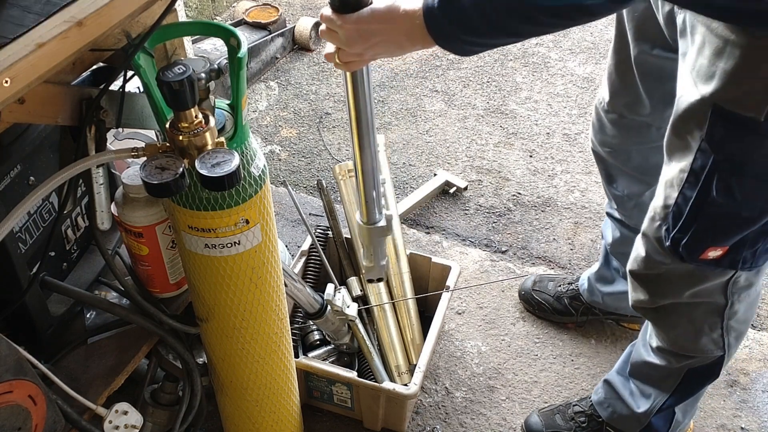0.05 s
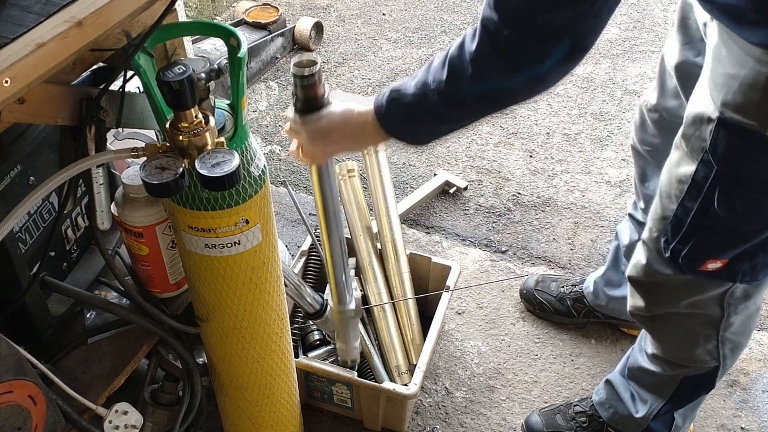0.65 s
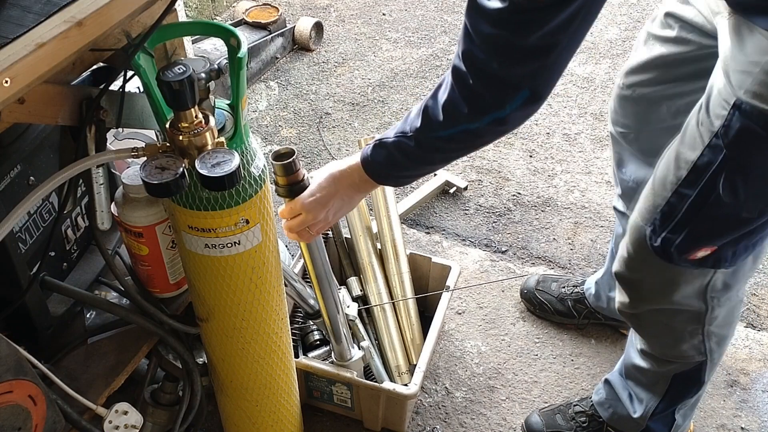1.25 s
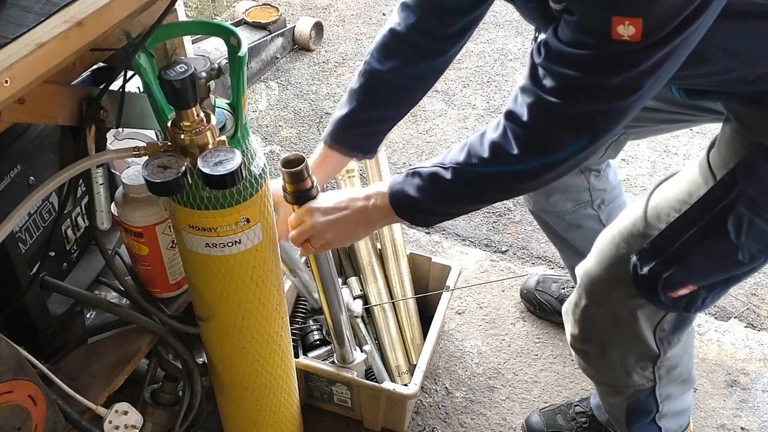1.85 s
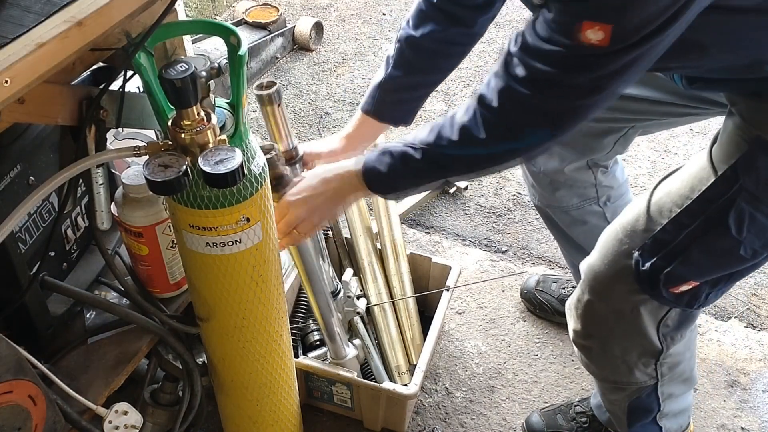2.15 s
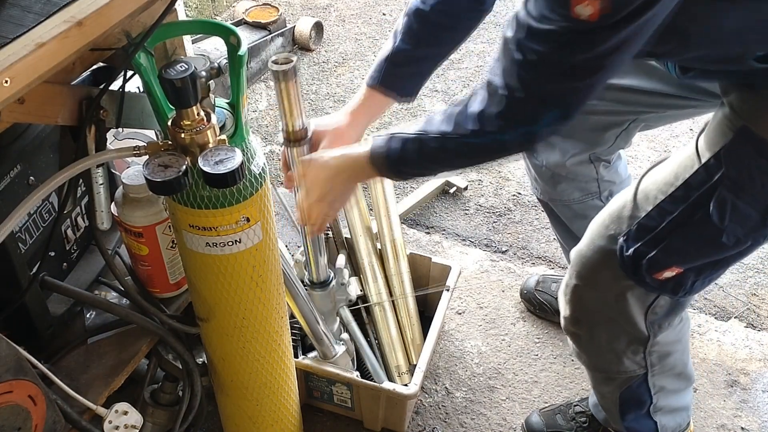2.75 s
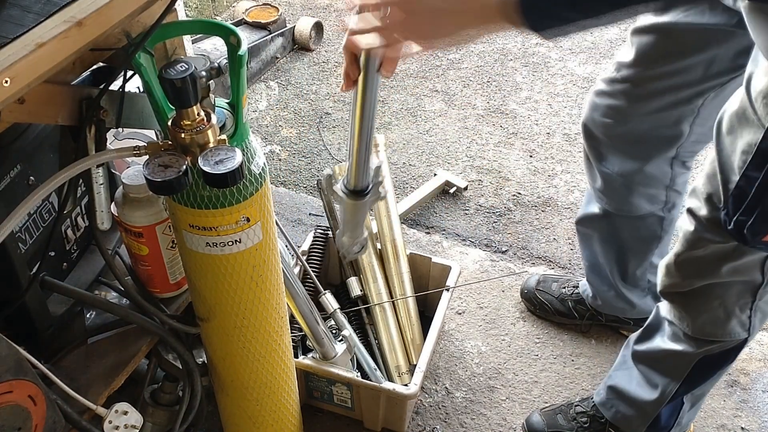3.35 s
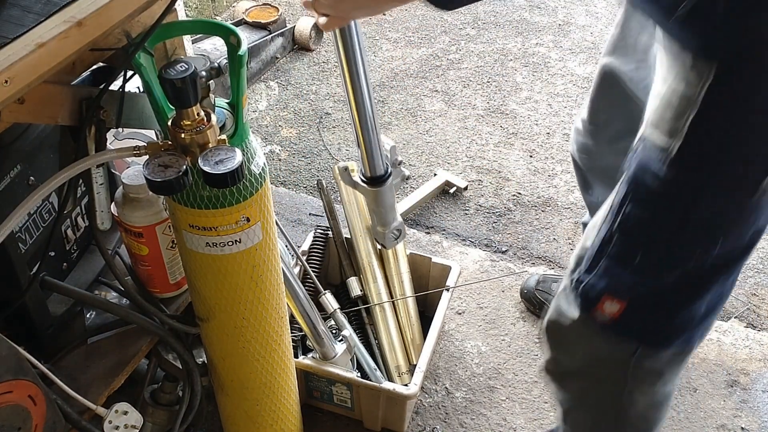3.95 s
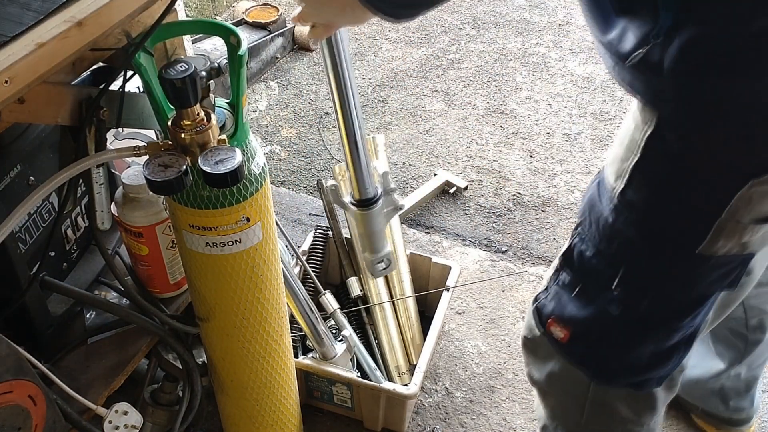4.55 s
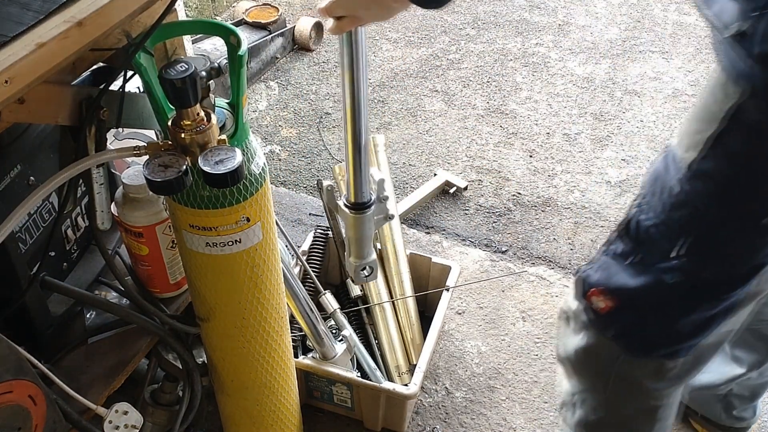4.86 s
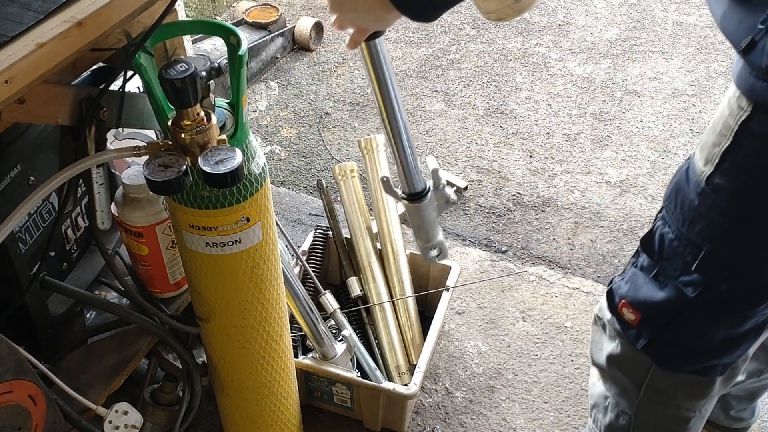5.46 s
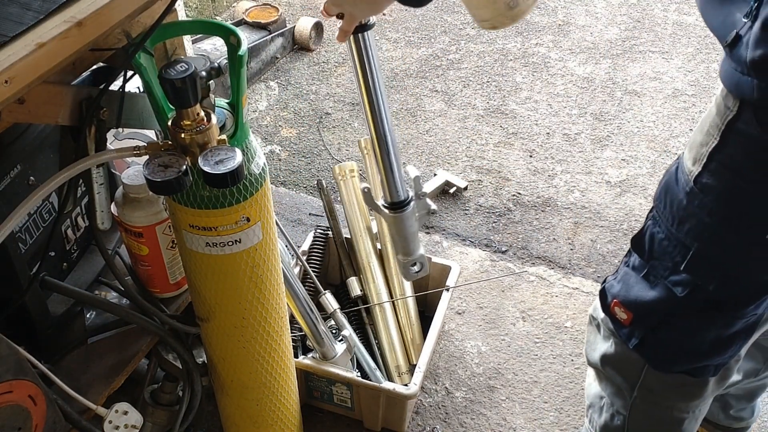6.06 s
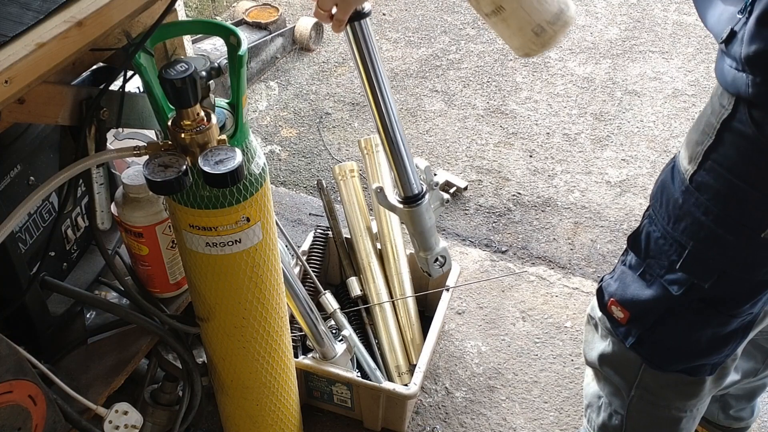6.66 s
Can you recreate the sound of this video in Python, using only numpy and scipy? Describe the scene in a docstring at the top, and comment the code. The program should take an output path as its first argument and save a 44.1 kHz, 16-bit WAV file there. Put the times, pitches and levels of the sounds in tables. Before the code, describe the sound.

Steel tubes and springs are knocked about in a plastic crate in a workshop, close by and slightly to the right. A first cluster of clanks and hollow bumps gives way to lighter shifting, then a louder, brighter burst of scraping and ringing metal. Afterwards come only scattered small clinks and the swish of work clothes, while air rushes softly and steadily through an open door.

```python
"""A faint clink and a soft glide, then metal knocks, gritty scrapes and ringing in a plastic crate.
A motorcycle fork leg is lowered among steel tubes and springs, shifted about and pulled out again.
Its blows rattle the heap, ring the tubes and boom the crate; stick-slip sets a coil spring singing.
The leg glides in the hand, work clothes swish, and outdoor air rushes softly through the workshop door."""
import sys
import numpy as np
from scipy import signal
from scipy.io import wavfile

SR = 44100
rng = np.random.default_rng(int(sys.argv[2]) if len(sys.argv) > 2 else 0)


def output_pcm(signal):
    """Save a mono or channel-first signal as 16-bit PCM at the path in sys.argv[1].

    Samples are clipped to [-1, 1] before scaling.
    """
    pcm = np.clip(np.atleast_2d(signal).T, -1, 1) * 32767
    wavfile.write(sys.argv[1], SR, np.round(pcm).astype(np.int16))


N = 295911
TIME_S = np.arange(N) / SR
TAIL_S = np.arange(int(.4 * SR)) / SR
BAND_EDGES_HZ = np.geomspace(28, 16000, 27)
BAND_HZ = np.sqrt(BAND_EDGES_HZ[1:] * BAND_EDGES_HZ[:-1])
BANK = [signal.butter(2, edge, "band", fs=SR, output="sos")
        for edge in zip(BAND_EDGES_HZ, BAND_EDGES_HZ[1:])]

# Tube and crate modes. Each row: frequency in Hz, level in dB, t60 in seconds, left minus right in dB.
TUBE_MODES = [(800, -15, .5, 0), (1219, -4, .22, -2), (1335, 0, .18, -3), (1410, 0, .11, -4),
              (1556, -8, .25, -3), (2300, -14, .16, -4), (3025, -13, .17, -5), (3383, -12, .22, -5)]
CRATE_MODES = [(123, -8, 0.17, -1.37), (140.3, -3.5, 0.29, 0), (181.6, -6.5, 0.18, -2),
               (238.6, -13, 0.17, -4), (272, -10.5, 0.17, -6), (360, -0.5, 0.26, 5), (435, -2.5, 0.21, -9),
               (553, 4, 0.28, 0), (624, -0.5, 0.26, -3)]
# Spectra of the rattling heap and the scraping edge. Each row: frequency in Hz, density in dB.
HEAP_SPECTRUM = [(60, -54), (95, -28), (128, -30), (190, -15), (280, -10.5), (420, -1), (620, -0.5),
                 (950, -1.5), (1500, -3), (2600, -12), (4000, -14.5), (7200, -24.5), (10000, -42.5),
                 (15000, -40)]
EDGE_SPECTRUM = [(300, -42), (1000, 0), (2500, 8), (4000, 5), (6500, 0.5), (8000, 4.5), (10000, -11.5),
                 (12000, -7), (15500, 0.5)]
# Joint decay of heap and workshop. Each row: frequency in Hz, t60 in seconds.
DECAY_S = [(130, 0.48), (450, 0.32), (1200, 0.25), (3000, 0.17), (7000, .17), (14000, 0.19)]
# Likeness of left and right. Each row: frequency in Hz, coherence (clipped to 0-1 in use).
COHERENCE = [(60, 3.9), (180, 0.7), (350, 0.93), (700, 0.41), (1400, 0.11), (3000, 0.03), (10000, 0)]
# Stereo balance of the heap. Each row: frequency in Hz, left minus right in dB.
BALANCE_DB = [(100, 6), (350, -1.5), (1400, -3), (3000, -2.5), (6000, -4.5), (9000, 5.5), (13000, -10)]


def knocks(heap_db=29.0, tube_db=-4, crate_db=-16.0, thud_hz=520, bright_hz=1300, boom=1.85):
    """Heavy blows reach the crate floor and boom; hard contacts are bright and ring the tubes."""
    # Each row: start in seconds, level in dB, treble tilt in dB per octave up, what is struck.
    blows = [(0.860, -57.5, 12, "heap"), (0.903, -35, 0.5, "crate"), (1.012, -35.5, -4, "heap"),
             (1.147, -37.5, 6.5, "heap"), (1.197, -20, 1, "heap"), (1.221, -29.5, -9, "crate"),
             (1.259, -37, -10, "crate"), (1.303, -46, 1, "tube"), (1.924, -35.5, -9.5, "heap"),
             (2.003, -40.5, -13, "heap"), (2.101, -51, 6.5, "heap"), (2.191, -56, 11, "heap"),
             (2.214, -43, -17, "tube"), (2.439, -32, -2, "crate"), (2.448, -31, -15, "crate"),
             (2.482, -33.5, 4, "crate"), (2.683, -39, -6.5, "heap"), (2.755, -31, 1, "tube"),
             (2.807, -34.5, 3, "rim"), (2.880, -22.5, 7, "tube"), (2.916, -20.5, 6.5, "crate"),
             (2.975, -29.5, 6, "tube on crate"), (3.011, -23, 5, "tube"), (3.036, -32.5, 8.5, "tube"),
             (3.998, -46.5, -2.5, "crate"), (4.045, -41.5, -1.5, "heap"), (4.143, -49, 1.5, "tube"),
             (4.190, -50, 7, "heap"), (4.626, -47.5, -4, "crate"), (4.964, -43, 2.5, "rim"),
             (5.041, -38.5, 3, "rim"), (5.871, -62.5, 7, "heap"), (6.064, -66.5, 8.5, "heap")]
    # Each entry, by what is struck: thud in dB per octave down, tube ring in dB.
    targets = {"crate": (3.14, -14), "heap": (-10.5, -16.5), "tube": (-23, 1.6), "tube on crate": (5, 0.71),
               "rim": (-18, -5)}
    out = np.zeros((2, N))
    octaves_below = np.clip(np.log2(thud_hz / BAND_HZ), 0, 1.3)
    octaves_above = np.maximum(np.log2(BAND_HZ / bright_hz), 0)
    first_swing = 1 + 1.3 * np.exp(-(TAIL_S / .014) ** 2)   # until neighbours damp the tubes
    for start_s, db, tilt, target in blows:
        thud, ring_db = targets[target]
        gains = band_gains(HEAP_SPECTRUM) * amp(thud * octaves_below + tilt * octaves_above)
        blow = amp(heap_db) * heap(gains, crack=0.14, crack_s=0.0018)
        blow += amp(tube_db + ring_db) * ring(TUBE_MODES) * first_swing
        blow += amp(crate_db + boom * thud) * ring(CRATE_MODES)
        # heavy blows press the parts together, light ones snap at once
        attack_s = 0.00067 * amp((db + 32) / 2)
        add(out, start_s, amp(db) * blow * (1 - np.exp(-TAIL_S / attack_s)))
    return out


def scrapes(tube_db=-37.0, spring_db=-36.5, crate_db=-49.5, touch_db=-12.5, lift_db_per_s=420):
    """Slips shake heap, tubes and crate; a biting edge adds hiss and makes the spring sing."""
    # Each row: start, time to full pressure and time to lift-off in seconds, pressure and bite in dB.
    strokes = [(1.146, 0.0042, 0.054, -27.5, -4.5), (2.10, 0.015, 0.15, -46, -39),
               (2.44, 0.0019, 0.055, -45.5, -5), (2.806, 0.05, 0.13, -29, 2.5),
               (2.97, 0.026, 0.1, -34.5, 8.5), (3.989, 0.019, 0.092, -52.5, -7),
               (4.945, 0.018, 0.098, -43.5, -1.5)]
    # Each row: frequency in Hz, level in dB, t60 in seconds, left minus right in dB.
    spring_modes = [(5604, -7, .2, -2), (6961, -8, .14, -3), (8807, -3, .17, 9), (10686, -5, .19, -9),
                    (11676, -2, .16, 0), (12732, 2, .18, -9), (13787, 4, .13, -6), (14330, -5, .12, -3),
                    (14906, -3, .15, 0)]
    out = np.zeros((2, N))
    for start_s, rise_s, lift_s, pressure_db, bite_db in strokes:
        effort_db = touch_db * np.maximum(1 - TAIL_S / rise_s, 0)
        effort_db -= lift_db_per_s * np.maximum(TAIL_S - lift_s, 0)
        force = amp(pressure_db + effort_db) * slips(per_s=800, spread_db=4.0)
        bite = amp(bite_db + 0.6 * effort_db)
        coil_force = force * np.maximum(bite - .5, 0) * np.minimum(bite, 1) ** 2
        body = heap(band_gains(HEAP_SPECTRUM), crack=1.3, crack_s=0.00075)
        body += amp(tube_db) * ring(TUBE_MODES) + amp(crate_db) * ring(CRATE_MODES)
        edge = heap(band_gains(EDGE_SPECTRUM), crack=1.0, crack_s=0.00083)
        coil = amp(spring_db) * ring(spring_modes)
        for drive, response in (force, body), (force * bite, edge), (coil_force, coil):
            add(out, start_s, signal.fftconvolve(drive[None], response))
    return out


def clinks(tick_db=14.5):
    """A touch ticks, rebounds a few times and rings one part alone."""
    # Each row: start in seconds, level in dB, part.
    touches = [(0.031, -54.5, "clamp"), (2.001, -40, "washer"), (2.446, -30, "wall"),
               (2.841, -25, "washer"), (2.882, -29, "washer"), (3.569, -33, "collar"),
               (3.628, -44, "collar"), (4.896, -51.5, "clamp"), (5.347, -46, "clamp"),
               (6.688, -41, "clamp")]
    # Each row, by part: frequency in Hz, level in dB, t60 in seconds.
    part_modes = {"washer": [(4460, -8.5, 0.18), (5170, -9.5, 0.13), (5450, -5, 0.3), (6400, -23, 0.25),
                  (6590, -9, 0.28)], "collar": [(2640, -22, 0.17), (3950, -2, 0.13), (4005, -2, 0.077),
                  (4250, -13, 0.11), (4480, -15, 0.11), (4900, -21, 0.084), (6900, -43, 0.16)],
                  "clamp": [(1375, -9, 0.054), (1583, 5, 0.032), (1800, 3, 0.02), (2410, -3, 0.093),
                  (2620, -5, 0.087)], "wall": [(175.4, -10, 0.2), (231, -2, .2), (282, 2, 0.11),
                  (347, 2, 0.073), (535, 4, 0.17)]}
    out = np.zeros((2, N))
    for start_s, db, part in touches:
        tick = amp(tick_db) * rattle(band_gains(EDGE_SPECTRUM), crack=0.43, crack_s=0.006)
        rebounds = slips(per_s=1200, spread_db=2.0) * np.exp(-TAIL_S / .008)
        contact = rebounds / (np.linalg.norm(rebounds) + 1e-9)
        contact[0] += .8   # first impact
        ringing = signal.fftconvolve(contact[None], ring(part_modes[part]))[:, :len(TAIL_S)]
        add(out, start_s, amp(db) * (ringing * pan(-5.0) + tick))
    return out


def heap(gains, crack, crack_s, mode_share=.45):
    """A dense rattle and a few clear modes share the energy of a contact."""
    dense = np.sqrt(1 - mode_share) * rattle(gains, crack, crack_s)
    return dense + np.sqrt(mode_share) * loose_modes(gains)


def rattle(gains, crack, crack_s):
    """A burst of rebounds, then dense modes and reflections that die first in the treble."""
    out = 0
    burst = crack * np.exp(-(TAIL_S / crack_s) ** 2)
    for sos, hz, gain in zip(BANK, BAND_HZ, gains):
        envelope = amp(-60 * TAIL_S / at_hz(DECAY_S, hz)) + burst
        out += gain * stereo_band(sos, hz, envelope) * pan(at_hz(BALANCE_DB, hz))
    return out


def loose_modes(gains, count=48, low_hz=380, high_hz=15000):
    """Each contact point wakes its own random modes in the loose parts."""
    hz = low_hz * (high_hz / low_hz) ** ((np.arange(count) + rng.random(count)) / count)
    t60_s = 0.51 * at_hz(DECAY_S, hz)
    scatter_db = -1.5 * np.clip(rng.standard_normal(count), -2, 2)
    db = 20 * np.log10(np.interp(hz, BAND_HZ, gains)) + scatter_db - 10 * np.log10(t60_s)
    sound = ring(np.transpose([hz, db, t60_s, at_hz(BALANCE_DB, hz)]))
    return sound * np.linalg.norm(gains[BAND_HZ > hz[0]]) / np.sqrt(np.sum(sound ** 2) / 2)


def ring(modes):
    """Struck modes decay; lower coherence sets left and right further apart in phase."""
    out = 0
    for hz, db, t60_s, *side_db in modes:
        apart_rad = np.arccos(np.clip(at_hz(COHERENCE, hz), 0, 1)) * rng.choice([-1, 1])
        phase_rad = 2 * np.pi * (hz * TAIL_S + rng.random()) + apart_rad * np.array([[.5], [-.5]])
        envelope = amp(db - 60 * TAIL_S / t60_s) * np.minimum(hz * TAIL_S, 1)
        out += envelope * np.sin(phase_rad) * pan(sum(side_db))
    return out


def slips(per_s, spread_db):
    """Stick-slip: tiny random impacts of uneven size; rms 1."""
    count = len(TAIL_S)
    sizes = amp(spread_db * np.clip(rng.standard_normal(count), -2, 2)) * rng.choice([-1, 1], count)
    clicks = sizes * (rng.random(count) < per_s / SR)
    return clicks / np.sqrt(np.mean(clicks ** 2) + 1e-12)


def glides():
    """The polished leg slides in the hand; fine friction hisses through its hollow resonances."""
    # Each row: middle and half length in seconds, level in dB.
    slides = [(0.292, 0.26, -62), (4.5, 0.25, -66.5)]
    # Each row: centre and width in Hz, level in dB.
    bore_resonances = [(1630, 850, 0.5), (3080, 210, -6.5), (4130, 960, 1)]
    hiss = 0
    for hz, width_hz, db in bore_resonances:
        sos = signal.butter(2, [hz - width_hz / 2, hz + width_hz / 2], "band", fs=SR, output="sos")
        hiss += amp(db) * stereo_band(sos, hz, np.ones(N))
    envelope = sum(amp(db) * swell(middle_s, half_s) for middle_s, half_s, db in slides)
    return np.sqrt(N) * hiss * envelope * pan(-2.7)


def clothes(cloth_db=3.0, rest_db=-73, flutter_db=2.2, folds_per_s=60, sheen_hz=10000):
    """Cloth rubs in uneven catches: a swish for each move of arm or leg, faint rubbing between."""
    # Each row: middle and half length in seconds, level in dB, treble sheen in dB.
    swishes = [(0.2, 0.17, -68, -7), (1.59, 0.19, -61.5, 2.5), (2.086, 0.32, -62.5, -2),
               (3.22, 0.26, -68.5, -2), (3.795, 0.12, -64.5, -3), (4.183, 0.068, -54.5, -7),
               (4.291, 0.024, -51.5, 2), (4.362, 0.043, -56, -3), (4.596, 0.15, -62, 1),
               (5.456, 0.084, -67, -7), (6.156, 0.046, -70, 10), (6.394, 0.14, -69.5, 8)]
    # Each row: frequency in Hz, density in dB.
    cloth_spectrum = [(300, -10.5), (1200, 7), (4000, 5.5), (7000, 5), (10000, -13), (12500, -2),
                      (15000, 9.5)]
    cloth = rush(cloth_spectrum) * pan(-3.3)
    rub = signal.sosfilt(signal.butter(4, sheen_hz, "low", fs=SR, output="sos"), cloth)
    sheen = signal.sosfilt(signal.butter(4, sheen_hz, "high", fs=SR, output="sos"), cloth)
    rub_gain = sheen_gain = amp(rest_db)
    for middle_s, half_s, db, sheen_db in swishes:
        swish = amp(db) * swell(middle_s, half_s)
        rub_gain = np.hypot(rub_gain, swish)
        sheen_gain = np.hypot(sheen_gain, swish * amp(sheen_db))
    catches = np.interp(TIME_S * folds_per_s, np.arange(N), rng.standard_normal(N))
    return amp(cloth_db + flutter_db * catches) * (rub_gain * rub + sheen_gain * sheen)


def outdoor_air(level_db=-54.0):
    """A steady rush through the open door."""
    # Each row: frequency in Hz, density in dB.
    air_spectrum = [(15, -59), (25, -28.5), (161, -18.5), (270, -30.5), (416, -4), (476, -4.5), (560, -3),
                    (641, 0.5), (1100, -8), (1940, -21), (4250, -24.5), (7710, -42), (8830, -30.5),
                    (10400, -60), (16000, -28)]
    return amp(level_db) * rush(air_spectrum) * pan(-1.3)


def rush(spectrum):
    """Steady coloured stereo noise; rms about 1."""
    bands = zip(BANK, BAND_HZ, band_gains(spectrum))
    return np.sqrt(N) * sum(gain * stereo_band(sos, hz, np.ones(N)) for sos, hz, gain in bands)


def stereo_band(sos, hz, envelope):
    """One enveloped band of partly coherent noise; mean energy 1 a side."""
    mid, side = signal.sosfilt(sos, rng.standard_normal((2, len(envelope))) * envelope)
    coherence = np.clip(at_hz(COHERENCE, hz), 0, 1)
    pair = np.sqrt(1 + coherence) * mid + np.sqrt(1 - coherence) * side * [[1], [-1]]
    return pair / np.sqrt(np.sum(pair ** 2) / 2)


def band_gains(spectrum):
    """Gain per band; total power 1."""
    gains = amp(at_hz(spectrum, BAND_HZ)) * np.sqrt(np.diff(BAND_EDGES_HZ))
    return gains / np.linalg.norm(gains)


def swell(middle_s, half_s):
    """Gaussian rise and fall; peak 1."""
    return np.exp(-((TIME_S - middle_s) / half_s) ** 2)


def at_hz(points, hz):
    """Interpolate a table over log frequency."""
    points_hz, values = np.transpose(points)
    return np.interp(np.log(hz), np.log(points_hz), values)


def amp(db):
    """Decibels to gain."""
    return 10 ** (np.asarray(db) / 20)


def pan(db):
    """Stereo gains for a left minus right level."""
    return amp(np.array([[db], [-db]]) / 2)


def add(out, start_s, sound):
    """Mix a sound in at a time."""
    at = int(np.clip(round(start_s * SR), 0, N - 1))
    out[:, at:at + sound.shape[1]] += sound[:, :N - at]


def scene(crate_cutoff_hz=112):
    """The crate lies a little to the right and radiates almost nothing below its lowest mode."""
    radiation = signal.butter(5, crate_cutoff_hz, "high", fs=SR, output="sos")
    contacts = signal.sosfilt(radiation, knocks() + scrapes() + clinks())
    return contacts + glides() + clothes() + outdoor_air()


def record(dry, cutoff_hz=15900):
    """Steep low-pass on the top treble."""
    return signal.sosfilt(signal.ellip(10, .2, 75, cutoff_hz, fs=SR, output="sos"), dry)


dry = scene()
out = record(dry)
output_pcm(out)
```